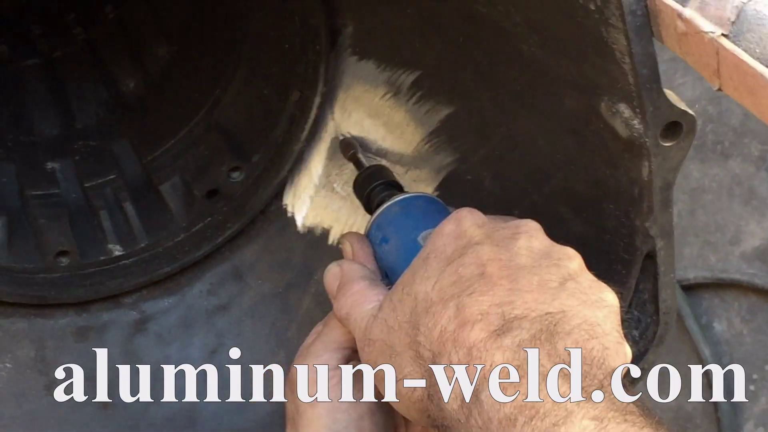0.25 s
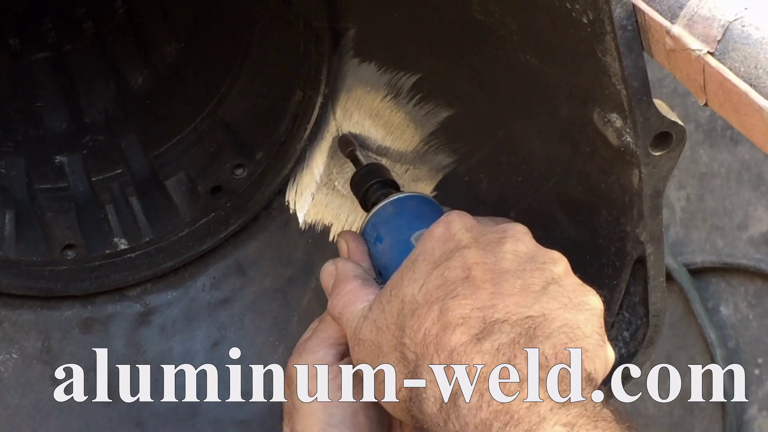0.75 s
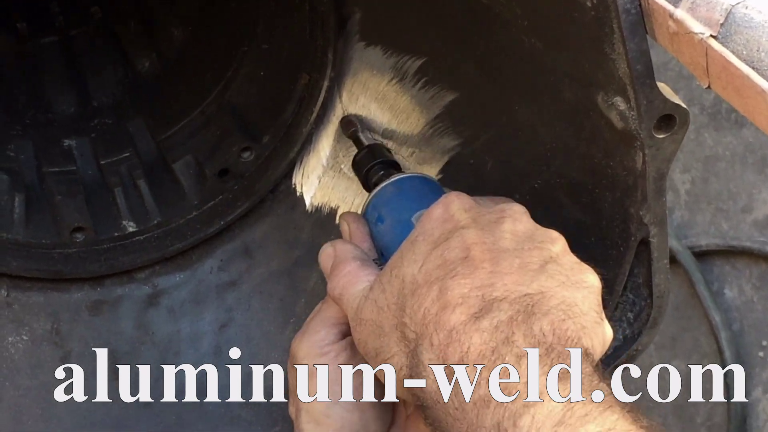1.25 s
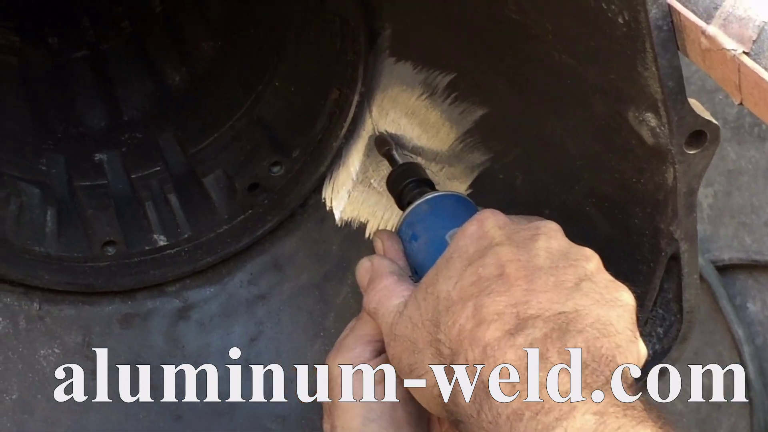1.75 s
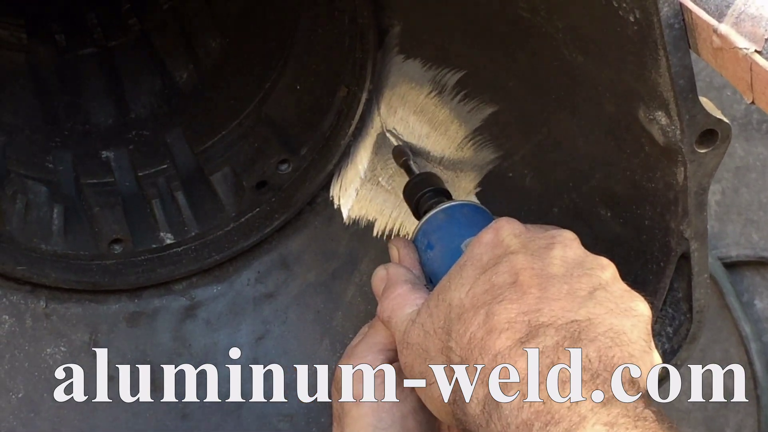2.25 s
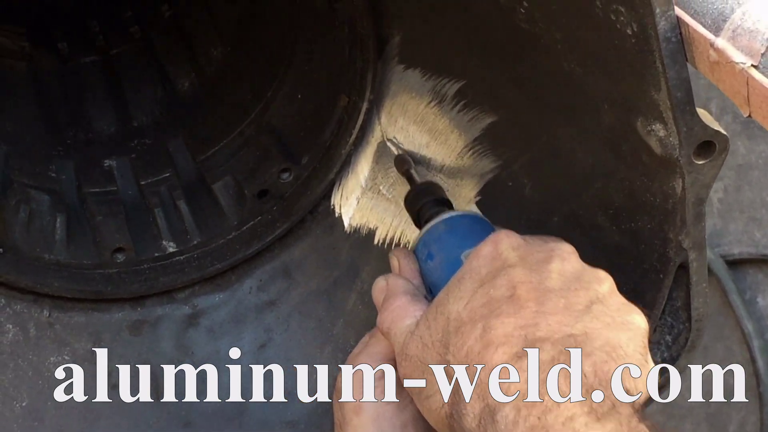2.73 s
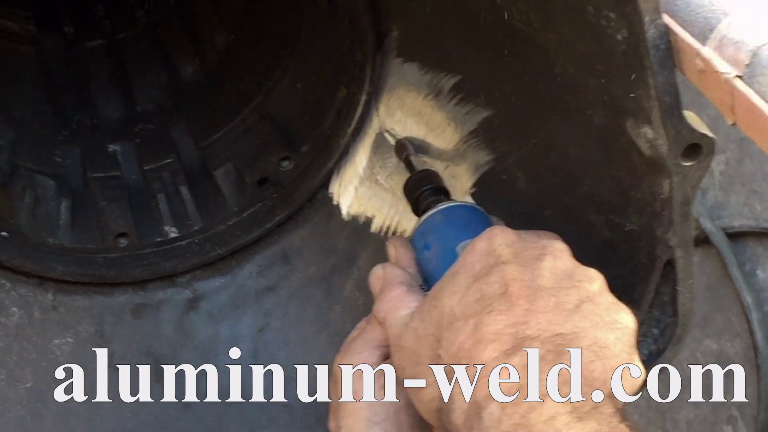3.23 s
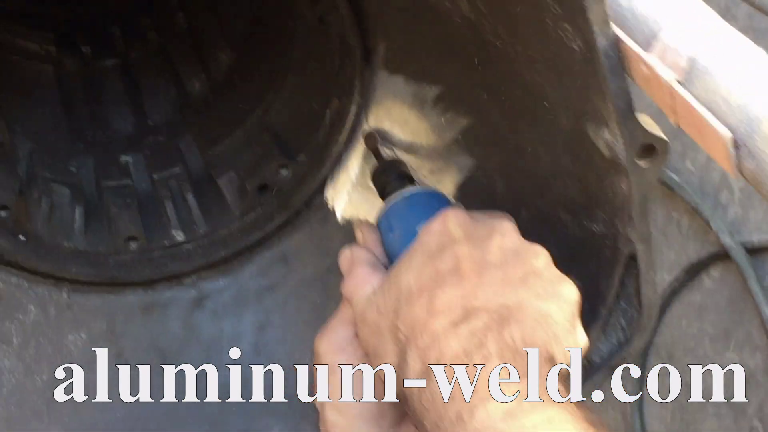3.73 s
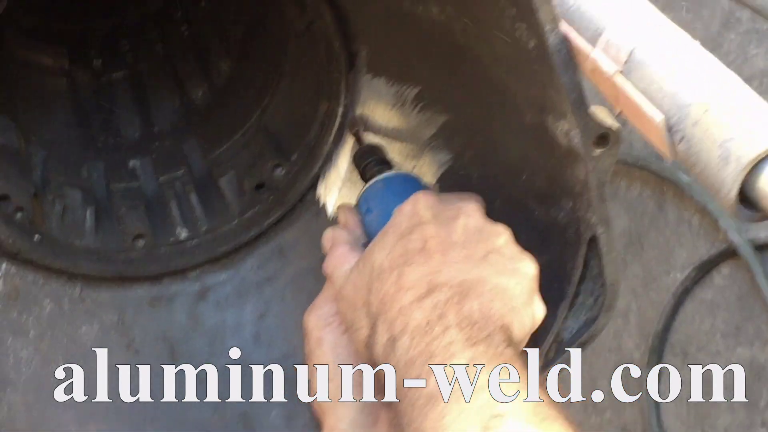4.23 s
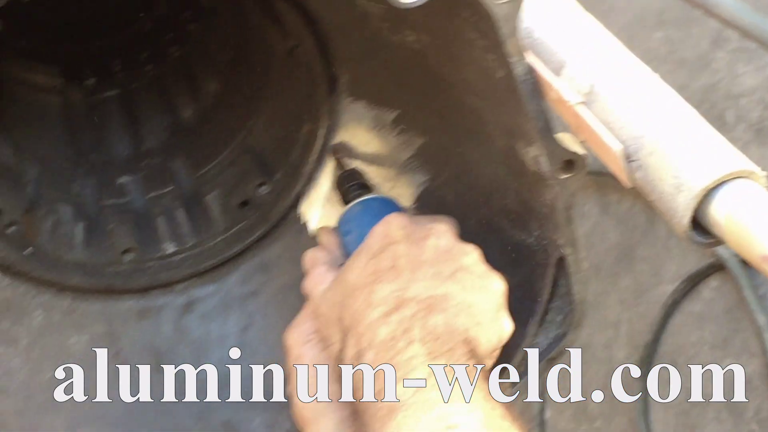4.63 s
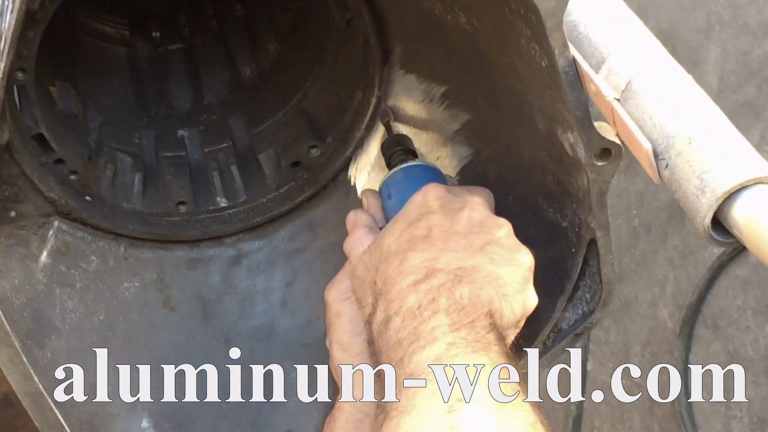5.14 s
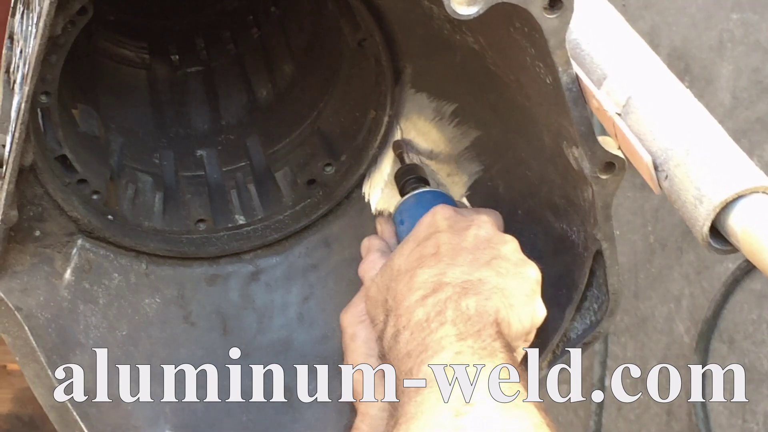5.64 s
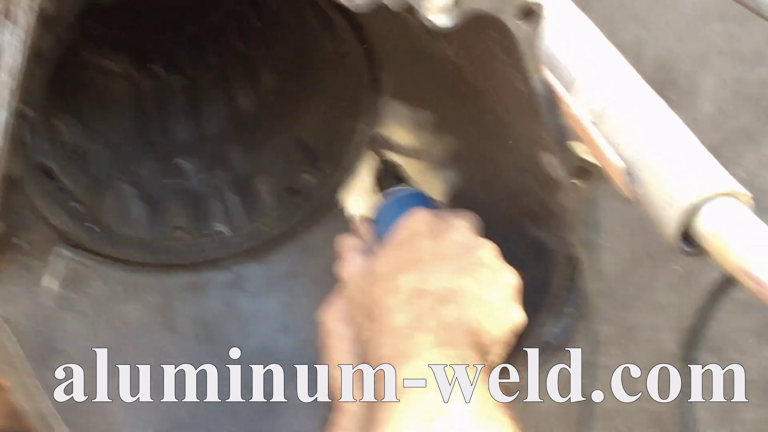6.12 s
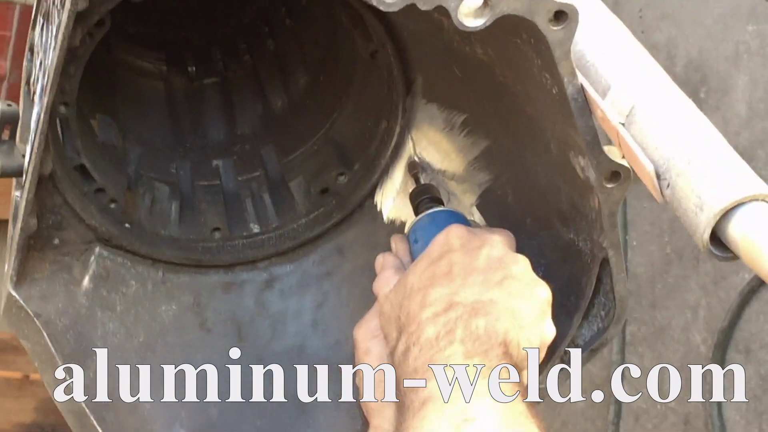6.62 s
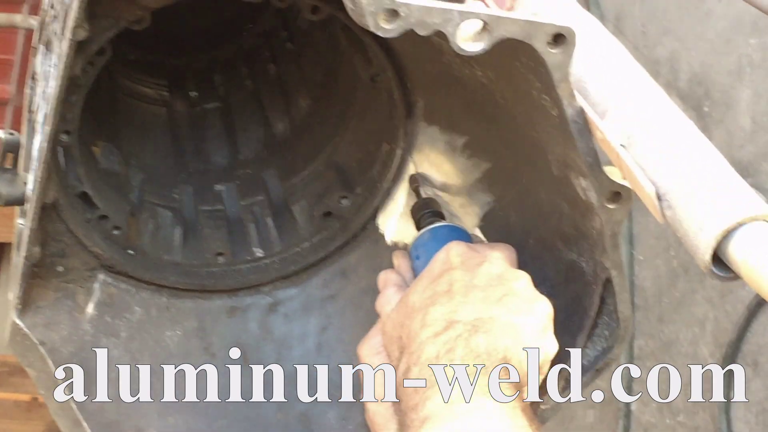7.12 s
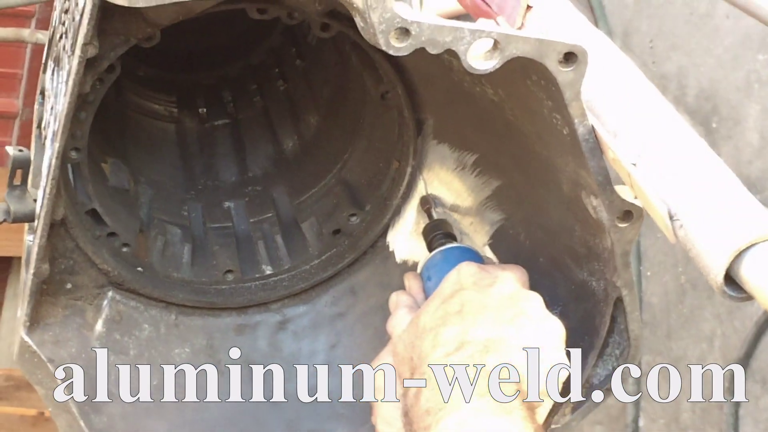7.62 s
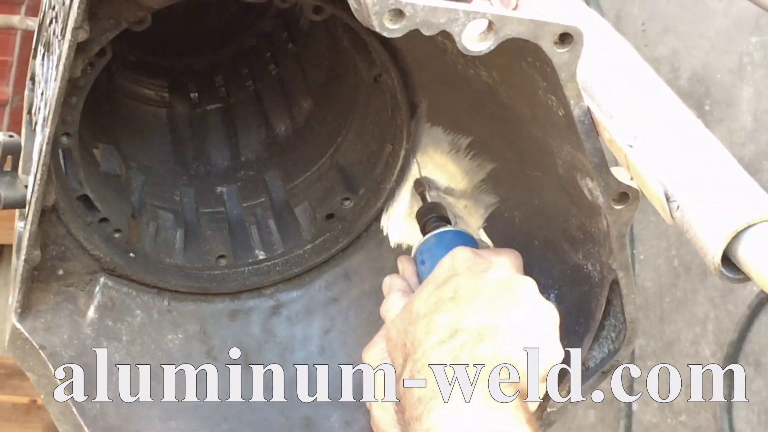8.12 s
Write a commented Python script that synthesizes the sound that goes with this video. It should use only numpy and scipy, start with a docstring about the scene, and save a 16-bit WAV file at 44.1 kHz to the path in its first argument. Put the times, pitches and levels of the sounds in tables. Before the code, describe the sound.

A handheld air grinder cuts a large hollow aluminium housing, heard very close in mono. Rough, bright scraping and ringing squeals ride over a vane whine and hissing exhaust. The pitch rises, collapses almost to a stall after about a second, restarts, falters again, then climbs into long steady cutting. Near six seconds it dips sharply and recovers. Short reflections come from the casting and nearby walls.

```python
"""A rough, pitched scrape and ringing metal: an air-driven die grinder cuts a large cast aluminium housing.
Flute forces that largely repeat every turn, mixed with random chip tearing, excite the casting's resonances;
single shaft multiples sing out as squeals. Four vanes whine at four times the shaft speed and exhaust air
hisses. The tool bogs down almost to a stall, restarts and slows again under load, heard close up in mono."""
import sys
import numpy as np
from scipy import signal
from scipy.fft import rfft, irfft, next_fast_len
from scipy.io import wavfile
from scipy.ndimage import uniform_filter1d, minimum_filter1d, map_coordinates

SR = 44100
rng = np.random.default_rng(int(sys.argv[2]) if len(sys.argv) > 2 else 0)


def materialize(psi):
    """Save the field psi as 16-bit PCM at rate SR to the path in sys.argv[1].

    A 1-D psi becomes a single channel; in a 2-D psi each row is a channel.
    """
    bounded = np.clip(np.atleast_2d(psi).T, -1, 1)
    quanta = np.round(bounded * 32767).astype(np.int16)
    wavfile.write(sys.argv[1], SR, quanta)


N = 369116


def amp(db):
    """Decibels to amplitude gain."""
    return 10 ** (np.asarray(db) / 20)


def rms_one(x):
    """Normalisation to an rms value of 1."""
    return x / np.sqrt(np.mean(x ** 2) + 1e-20)


def in_time(rows):
    """Linear interpolation: each column of a curve table becomes one value per sample."""
    s, *columns = np.transpose(rows)
    return [np.interp(np.arange(N) / SR, s, column) for column in columns]


def colour(x, spectrum):
    """Linear filtering in the frequency domain by a (Hz, dB) gain curve, scaled to rms 1."""
    size = next_fast_len(N)
    hz, db = np.transpose(spectrum)
    log_hz = np.log(np.maximum(np.fft.rfftfreq(size, 1 / SR), 1))
    gain = amp(np.interp(log_hz, np.log(hz), db))
    return rms_one(irfft(rfft(x, size) * gain, size)[:N])


def drift(rate_hz):
    """Low-passed random noise of rms 1: a double pole at rate_hz sets how fast it wanders."""
    step = 40   # samples between computed points
    r = np.exp(-2 * np.pi * rate_hz * step / SR)
    noise = rng.standard_normal(N // step + 2002)
    slow = rms_one(signal.lfilter([1], [1, -2 * r, r * r], noise)[2000:])
    return np.interp(np.arange(N) / step, np.arange(len(slow)), slow)


def resonance(x, hz, width_hz):
    """Damped mode: a two-pole resonance with about unit gain at its peak."""
    r = np.exp(-np.pi * width_hz / SR)
    feed = np.array([1, 0, -1]) * (1 - r * r) / 2
    return signal.lfilter(feed, [1, -2 * r * np.cos(2 * np.pi * hz / SR), r * r], x)


def band_noise(low_hz, high_hz):
    """Band-limited random pressure, scaled to rms 1."""
    band = signal.butter(2, [low_hz, high_hz], "band", fs=SR, output="sos")
    return rms_one(signal.sosfilt(band, rng.standard_normal(N)))


# air motor speed: start_s, shaft_turns_per_s
SHAFT_SPEED = [(0, 196), (0.07, 209), (0.16, 215.2), (0.38, 200.6), (0.56, 219), (0.75, 230.5), (0.9, 278),
               (1.05, 287.6), (1.13, 276.4), (1.15, 260), (1.17, 232), (1.21, 155), (1.24, 102), (1.27, 76),
               (1.35, 44), (1.4, 42), (1.42, 45), (1.44, 64), (1.47, 130), (1.51, 175), (1.55, 197),
               (1.59, 165), (1.63, 125), (1.66, 104), (1.7, 87), (1.76, 97), (1.82, 171.6), (1.86, 211),
               (1.9, 241.6), (1.94, 254.3), (2.0, 271.8), (2.15, 279.6), (2.39, 300.1), (2.64, 290.5),
               (2.78, 302.9), (2.87, 296.2), (3.02, 305.5), (3.49, 301.3), (3.68, 305), (3.98, 303.9),
               (4.4, 310.2), (4.57, 305.1), (5.06, 320.1), (5.17, 315), (5.7, 313.7), (5.74, 319.4),
               (5.8, 335.7), (5.95, 333.6), (5.99, 284), (6.02, 219), (6.05, 196), (6.1, 216),
               (6.16, 263.5), (6.2, 301), (6.25, 326.4), (6.3, 331.2), (6.55, 344.4), (6.7, 349.7),
               (6.88, 338.9), (7.1, 339.4), (7.3, 331), (7.8, 330), (7.92, 341.2), (8.07, 344.8),
               (8.37, 337)]


def shaft_speed():
    """Rotational inertia: a moving average rounds every change of shaft speed."""
    return uniform_filter1d(in_time(SHAFT_SPEED)[0], size=600)


def flute_pattern(turns, memory_turns, size=128):
    """Periodicity with fading memory: a force round the burr that is slowly rewritten from turn to turn."""
    keep = np.exp(-1 / memory_turns)
    orders = rfft(rng.standard_normal((2800, size)), axis=1)
    orders[:, [0, 1, 2, 4]] = 0   # no steady push, and shaft multiples 1, 2 and 4 are left out
    force = irfft(orders, size, axis=1)
    for _ in range(2):
        force = signal.lfilter([1], [1, -keep], force, axis=0)
    return rms_one(map_coordinates(force[100:].ravel(), [turns * size], order=3))


# contact and spent air: start_s, cutting_force_db, hiss_db
CUT = [(0.0, -11.5, -22), (0.09, -13, -24), (0.16, -17.5, -26), (0.23, -11, -22), (0.58, -10, -26.5),
       (0.77, -12.5, -21), (1.02, -11.5, -17.5), (1.19, -11.5, -24.5), (1.3, -23.5, -33), (1.35, -48, -55),
       (1.4, -38, -51), (1.44, -20, -28), (1.49, -12, -24), (1.56, -10.5, -22), (1.72, -23, -28.5),
       (1.89, -8, -19.5), (2.1, -13.5, -26), (2.17, -9, -20.5), (2.45, -15.5, -22), (2.63, -10.5, -17),
       (2.68, -10.5, -19), (3.4, -8, -21.5), (3.45, -4, -16.5), (3.61, -12, -21), (3.68, -9.5, -23),
       (3.89, -12.5, -19), (4.15, -11.5, -19), (4.36, -13, -22), (4.5, -12, -19), (4.61, -15, -20),
       (4.68, -14.5, -15), (4.75, -11, -17.5), (5.85, -10, -21), (5.92, -32, -26.5), (6.01, -27, -33),
       (6.11, -10, -21), (6.34, -11.5, -15), (6.67, -15, -21.5), (6.81, -12, -20.5), (7.95, -10.5, -19),
       (8.04, -12, -19.5), (8.37, -11, -19)]
# share of the force that repeats each turn at steady speed: start_s, share_0_to_1
REPEAT = [(0, .45), (1.1, .45), (2.2, .7), (2.7, .45), (3.5, .45), (3.7, .85), (5.8, .75), (6.7, .7),
          (7.0, .5), (8.37, .55)]
# share of the repeating force that alternates between turns as the burr hops: start_s, share_0_to_1
HOP = [(0, 0), (.5, 1), (.7, 0), (8.37, 0.15)]
# casting resonances: pitch_hz, width_hz, gain_db
CASTING = [(1365, 10, 2), (1835, 26, -14.5), (2010, 38, 1), (2110, 9, -4.5), (2508, 23.4, 0.5),
           (2845, 25, -5), (2960, 56, -11.5), (3538, 117, 5), (4006, 26.5, 1), (3990, 21, -4),
           (4800, 33, -22), (5084, 100, -3.5), (5930, 23, -32.5), (5640, 8.7, -19), (6358, 82, -1.5),
           (6760, 50, -2), (7340, 10, -36), (7430, 13, -1.5), (7800, 29, -41.5), (8390, 24, -10),
           (9220, 410, -20.5), (11000, 53, -30.5)]
# directly radiated scrape: pitch_hz, relative_gain_db
SCRAPE = [(150, -51), (400, -54), (900, -58), (1500, -11), (2300, -1), (3500, 2.5), (5000, -2.5),
          (7000, -8), (10000, -19), (15000, -35)]


def burr(speed, turns):
    """Forced vibration: repeating flute force and random chip tearing, heard directly and through casting modes."""
    unsteady_turns_per_s2 = 680   # change of speed that halves the repeating share
    acceleration = uniform_filter1d(np.gradient(speed), size=2000) * SR
    repeat = in_time(REPEAT)[0] / (1 + (acceleration / unsteady_turns_per_s2) ** 2)
    hop = in_time(HOP)[0]
    chips = rms_one(rng.standard_normal(N) * amp(5.4 * drift(130)))
    # cos(pi * turns) changes sign from one turn to the next
    alternate = np.cos(np.pi * turns) * np.sqrt(2) * flute_pattern(turns, memory_turns=8.9)
    flutes = np.sqrt(1 - hop) * flute_pattern(turns, memory_turns=6.4) + np.sqrt(hop) * alternate
    force_db = in_time(CUT)[0] + 1.67 * drift(6.6) + 0.96 * drift(25)
    force = (np.sqrt(repeat) * flutes + np.sqrt(1 - repeat) * chips) * amp(force_db)
    rings = np.zeros(N)
    for hz, width_hz, gain_db in CASTING:
        # the wandering burr drives each resonance now more, now less
        contact = amp(2 * drift(1.22) + 1.56 * drift(23))
        rings += amp(gain_db) * resonance(force * contact, hz, width_hz)
    force_rms = np.sqrt(np.mean(force ** 2))
    return force_rms * (amp(-5.5) * colour(force, SCRAPE) + amp(-6.0) * rms_one(rings))


# a flute harmonic meets a casting resonance: start_s, length_s, pitch_hz, level_db
SQUEALS = [(0.03, 0.083, 3500, -11), (0.21, 0.21, 3520, -23), (0.515, 0.2, 3530, -19),
           (0.55, 0.28, 4000, -19), (0.837, 0.45, 3710, -14), (0.91, 0.29, 5100, -15),
           (0.992, 0.095, 5750, -12), (1.955, 0.14, 3580, -10), (2.14, 0.13, 2000, -18),
           (2.26, 0.083, 3520, -9), (2.327, 0.29, 5040, -19.5), (2.473, 0.22, 3520, -13.5),
           (2.765, 0.23, 3600, -16.5), (2.93, 0.6, 2750, -23), (2.974, 0.13, 3960, -14),
           (3.26, 0.13, 3370, -13), (3.278, 0.12, 3980, -8), (3.424, 0.13, 2110, -19),
           (3.573, 0.13, 6390, -22), (3.575, 0.45, 3650, -19), (3.651, 0.1, 3960, -6.5),
           (3.96, 0.26, 6430, -22.5), (3.958, 0.24, 2740, -26), (4.02, 0.32, 4590, -24),
           (4.03, 0.14, 5810, -18), (4.12, 0.085, 3990, -26), (4.264, 0.22, 4340, -21),
           (4.534, 0.13, 3990, -11.5), (4.544, 0.095, 6430, -11.5), (4.681, 0.22, 3450, -14.5),
           (4.935, 0.32, 3510, -15.5), (5.213, 0.13, 2830, -19), (5.25, 0.21, 3460, -17),
           (5.4, 0.14, 2510, -23), (5.497, 0.19, 3450, -17), (5.74, 0.13, 2010, -19.5),
           (6.198, 0.093, 3600, -14), (6.3, 0.094, 6300, -15.5), (6.3, 0.2, 4040, -27),
           (6.3, 0.33, 2030, -26), (6.8, 0.2, 3420, -26), (6.9, 0.47, 2010, -20.5),
           (7.12, 0.34, 3640, -19.5), (7.166, 0.082, 4010, -10.5), (7.3, 0.44, 3970, -28),
           (7.35, 0.34, 1990, -21.5), (7.403, 0.42, 3310, -19), (7.64, 0.17, 4950, -22),
           (7.67, 0.16, 3630, -23), (7.82, 0.094, 2020, -17.5), (7.83, 0.22, 4070, -17),
           (8.046, 0.2, 3420, -25), (8.056, 0.28, 2040, -26.5)]


def squeals(speed, turns):
    """Resonant coincidence: the shaft multiple nearest each pitch swells, and weakens as it glides off."""
    fade_s, width_hz = 0.051, 136   # width: distance off the resonance that halves the amplitude
    out, t = np.zeros(N), np.arange(N) / SR
    for start, length, hz, db in SQUEALS:
        multiple = round(hz / np.interp(start + length / 2, t, speed))
        first = max(round((start - 3 * fade_s) * SR), 0)
        on = slice(first, round((start + length + 3 * fade_s) * SR))
        rise = np.tanh((t[on] - start) / fade_s)
        fall = np.tanh((t[on] - start - length) / fade_s)
        swell = (rise - fall) / 2 / (1 + ((multiple * speed[on] - hz) / width_hz) ** 2)
        waver = amp(2.92 * drift(33)[on])
        tone = np.sin(2 * np.pi * multiple * turns[on] + 0.94 * drift(16.5)[on])
        out[on] += np.sqrt(2) * amp(db) * swell * waver * tone
    return out


# vane whine before the housing gain: start_s, relative_level_db
WHINE = [(0, -26.5), (.56, -33.5), (.9, -23.5), (1.05, -26), (1.17, -30.5), (1.23, -16), (1.27, -43),
         (1.4, -62), (1.415, -33.5), (1.47, -18), (1.66, -35.5), (1.76, -30), (1.82, -17.5), (1.9, -28),
         (2.15, -22.5), (2.39, -27.5), (3.68, -28), (4.4, -19.5), (4.57, -23.5), (5.17, -19.5), (5.7, -21),
         (5.95, -24.5), (5.99, -16.5), (6.02, -27), (6.1, -35), (6.16, -19), (6.22, -21), (6.55, -15.5),
         (7.15, -20.5), (8.37, -17.5)]
# whine gain of the tool housing: pitch_hz, extra_gain_db
HOUSING = [(150, 3.5), (450, 0.5), (750, -2.5), (1050, 6), (1200, 1.9), (1400, -4.8)]
# further tones of the motor: multiple_of_shaft_speed, peak_level_db at 330 turns per s
MOTOR_TONES = [(6, -37), (8, -31), (12, -33), (3, -46)]
# unbalanced shaft: start_s, once_a_turn_relative_db, twice_a_turn_relative_db
RUNOUT = [(0, -52.5, -43), (.8, -44.5, -47.5), (1.1, -55, -34), (1.3, -64, -66), (1.55, -42, -46),
          (2.0, -58, -43), (2.3, -41, -43.5), (3.1, -46.5, -45), (3.3, -37.5, -41.5), (4.4, -39, -45.5),
          (4.7, -52, -53), (5.1, -56, -47.5), (5.4, -58, -54.5), (6.15, -50.5, -48), (6.4, -57, -27),
          (6.6, -53, -48), (6.9, -59, -36.5), (7.5, -46.5, -44.5), (8.0, -58, -37), (8.2, -55, -54),
          (8.37, -44, -37)]


def motor(speed, turns):
    """Rotating-source orders: vane passing tone, further shaft multiples, and low orders of an unbalanced shaft."""
    def order(multiple):
        return np.sin(2 * np.pi * multiple * turns)

    slow = np.clip(1 - speed / 130, 0, 1)
    whine_db = in_time(WHINE)[0] + np.interp(4 * speed, *np.transpose(HOUSING)) + 3
    # at low speed the four vanes slap unevenly: the tone frays and low gusts ride on it
    out = amp(whine_db + .6 * drift(20) + 4 * slow * drift(70)) * order(4)
    out += slow * amp(whine_db) * band_noise(110, 550)
    speed_gain = (speed / 330) ** 1.1
    for multiple, db in MOTOR_TONES:
        out += amp(db + 1.4 * drift(13)) * speed_gain * order(multiple)
    once_db, twice_db = in_time(RUNOUT)
    out += amp(once_db - 0.5 + 2.6 * drift(15)) * order(1)
    out += amp(twice_db + 2.5 + 3.9 * drift(12)) * order(2)
    # hopping beats three times in two turns
    return out + in_time(HOP)[0] * amp(-42.0 + 5.4 * drift(10)) * order(1.5)


# exhaust air: pitch_hz, relative_gain_db
EXHAUST = [(1500, -24.5), (4000, 0.5), (8000, 1), (12000, -3), (13200, -5), (15500, -15)]


def exhaust(turns):
    """Modulated jet noise: spent air puffs with each vane and each turn, partly alike from turn to turn."""
    alike = 0.2   # power share that repeats
    puffs = 1 + 0.18 * np.sin(2 * np.pi * 4 * turns) + 0.18 * np.sin(2 * np.pi * turns)
    fresh = puffs * rng.standard_normal(N)
    air = np.sqrt(1 - alike) * fresh + np.sqrt(alike) * flute_pattern(turns, memory_turns=6.8)
    hiss_db = in_time(CUT)[1] + 1.3 * drift(1.9) + 1.34 * drift(25)
    return amp(hiss_db) * colour(air, EXHAUST)


# short dull low noise bursts, each with a low thud: start_s, burst_drive_db, thud_relative_db
LOW_BURSTS = [(0.9, -36, -27), (0.998, -32, -26), (2.607, -26.5, -28), (2.869, -20.5, -14.5),
              (3.046, -22, -24), (3.129, -28, -32), (3.326, -17.5, -28), (3.389, -32, -27),
              (3.44, -29, -27), (3.469, -26.5, -35), (3.548, -33, -32), (3.699, -29.5, -25),
              (5.016, -33, -32), (5.087, -28, -38), (5.729, -31, -31), (7.198, -27.5, -39),
              (7.249, -52, -26), (7.869, -44, -17)]


def low_bursts():
    """Impulse response: each impulse shapes a short dull noise burst and a rapidly damped low thud."""
    burst_drive, thud_drive = np.zeros(N), np.zeros(N)
    for start, db, thud_db in LOW_BURSTS:
        burst_drive[round(start * SR)] = amp(db)
        thud_drive[round(start * SR)] = amp(db + thud_db + 28)
    t = np.arange(4000) / SR
    burst_shape = np.exp(-t / 0.017) * (1 - np.exp(-t / 0.00097))
    thud_shape = np.exp(-t / 0.0043) * np.sin(2 * np.pi * 95 * t)
    burst = signal.fftconvolve(burst_drive, burst_shape)[:N] * band_noise(120, 1000)
    return burst + signal.fftconvolve(thud_drive, thud_shape)[:N]


# low shaking of tool and casting: start_s, level_db
SHAKE = [(0, -42), (1.2, -34.5), (1.37, -50), (1.43, -30), (1.6, -29.5), (1.9, -33), (2.28, -47),
         (2.87, -39), (3.5, -38), (4.0, -45), (6.2, -43.5), (8.37, -48)]
# its spectrum: pitch_hz, relative_gain_db
RUMBLE = [(25, -17), (60, -16), (120, -5.5), (250, -14.5), (500, -3.5), (900, 0.5), (1400, 4), (2500, -56)]


def rattle():
    """Random vibration: low coloured noise whose level wanders in short uneven bursts."""
    shake_db = in_time(SHAKE)[0] + 2.5 * drift(11) + 2.5 * drift(45)
    return amp(shake_db) * colour(rng.standard_normal(N), RUMBLE)


def echoes(x, t60_s=0.27):
    """Diffuse reverberation: an exponentially decaying tail from the hollow housing and nearby walls."""
    t = np.arange(round(.4 * SR)) / SR
    tail = rng.standard_normal(len(t)) * amp(-60 * t / t60_s) * (t > .004)
    return signal.fftconvolve(x, tail / np.sqrt(np.sum(tail ** 2)))[:N]


def scene():
    """Superposition of cutting, air, motor, low bursts, rattle and echoes, the same in both channels."""
    speed = shaft_speed()
    turns = np.cumsum(speed) / SR
    tool = burr(speed, turns) + squeals(speed, turns) + exhaust(turns) + low_bursts()
    mono = tool + amp(-7.5) * echoes(tool) + motor(speed, turns) + rattle()
    return np.array([mono, mono])


def record(dry):
    """Peak limiting followed by band limiting: a fast gain dip at peaks, then deep bass and top are cut."""
    allowed = np.minimum(1, .97 / (np.abs(dry) + 1e-9))
    gain = uniform_filter1d(minimum_filter1d(allowed, size=41), size=41)
    high_pass = signal.butter(2, 42, "high", fs=SR, output="sos")
    low_pass = signal.ellip(10, .5, 75, 15500, fs=SR, output="sos")
    return signal.sosfilt(low_pass, signal.sosfilt(high_pass, gain * dry))


dry = scene()
out = record(dry)
materialize(out)
```